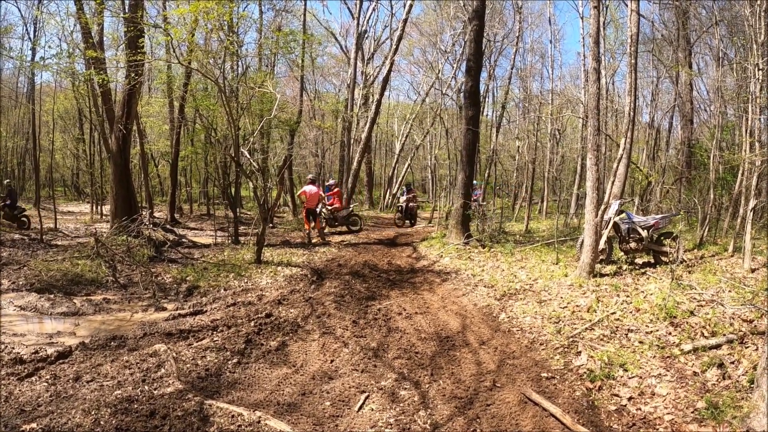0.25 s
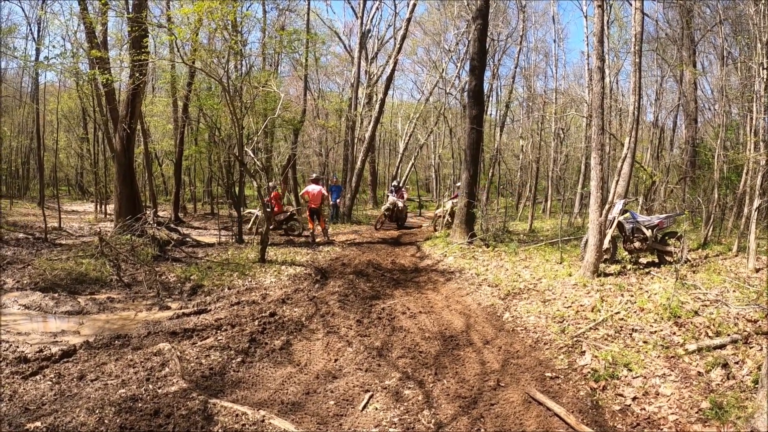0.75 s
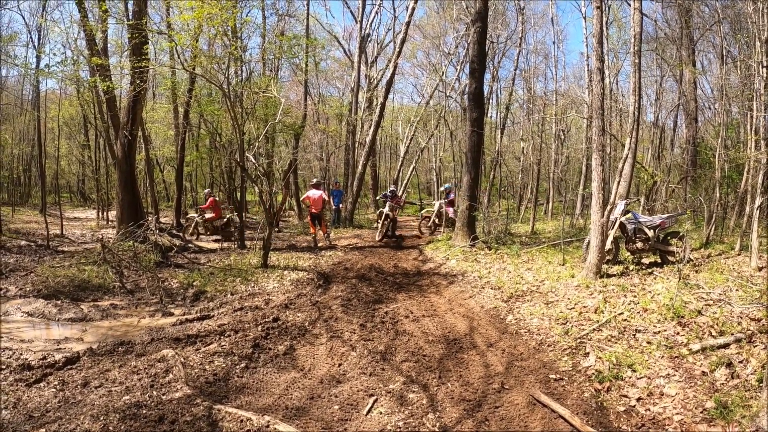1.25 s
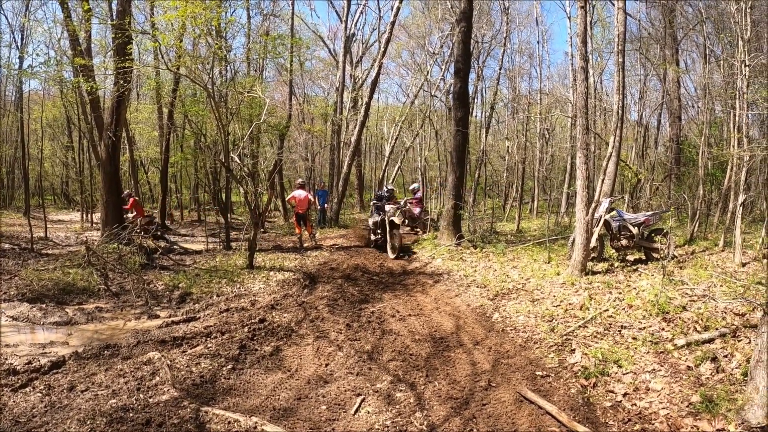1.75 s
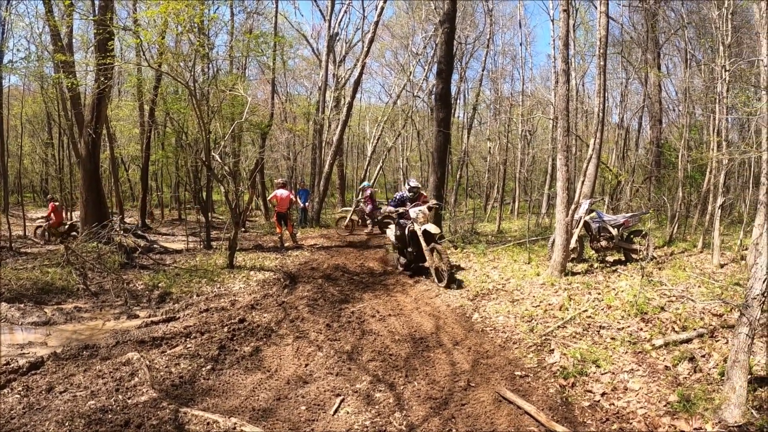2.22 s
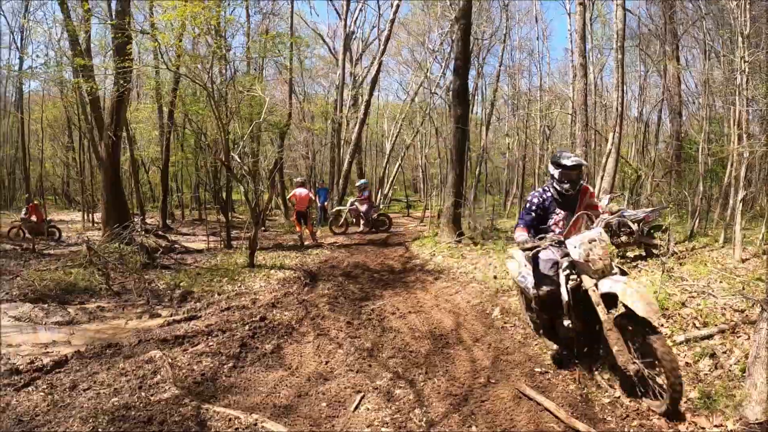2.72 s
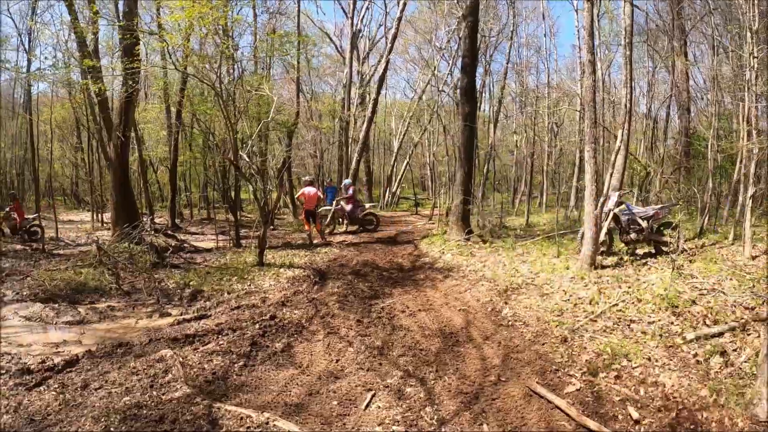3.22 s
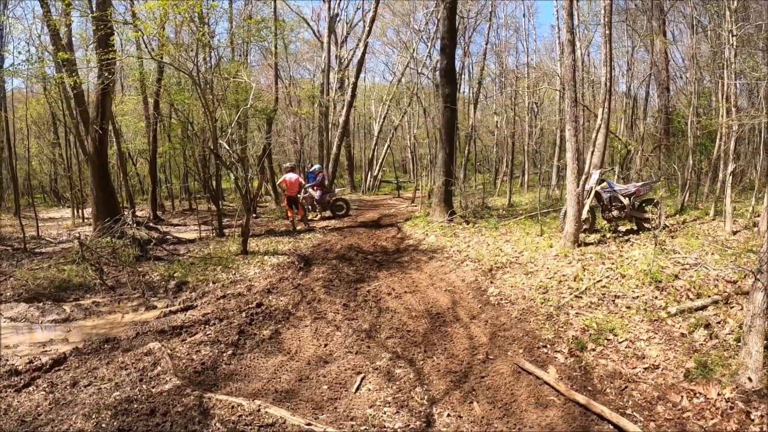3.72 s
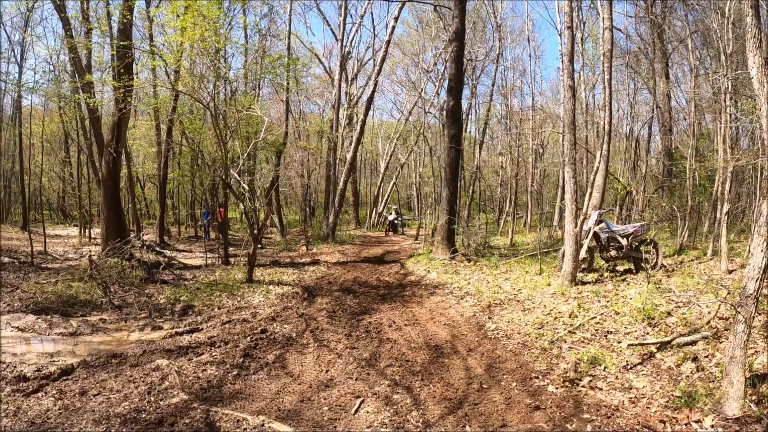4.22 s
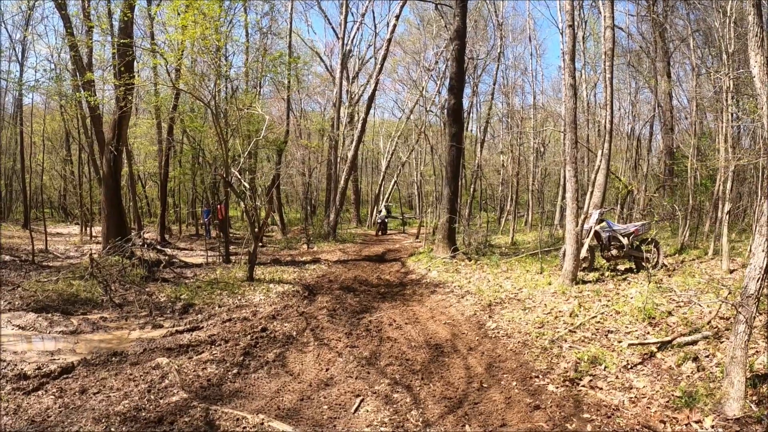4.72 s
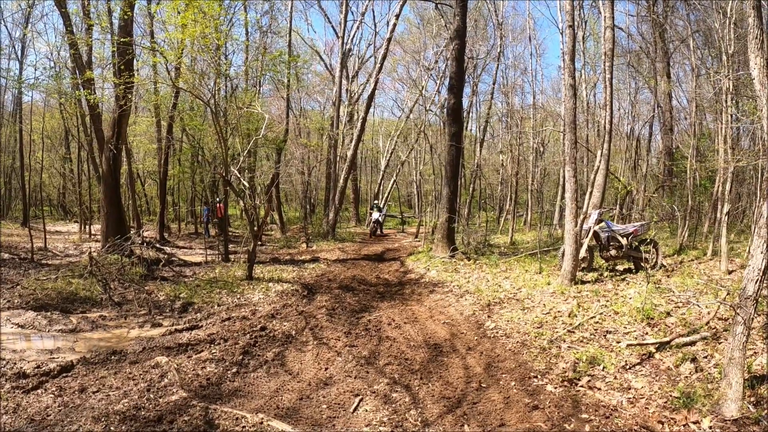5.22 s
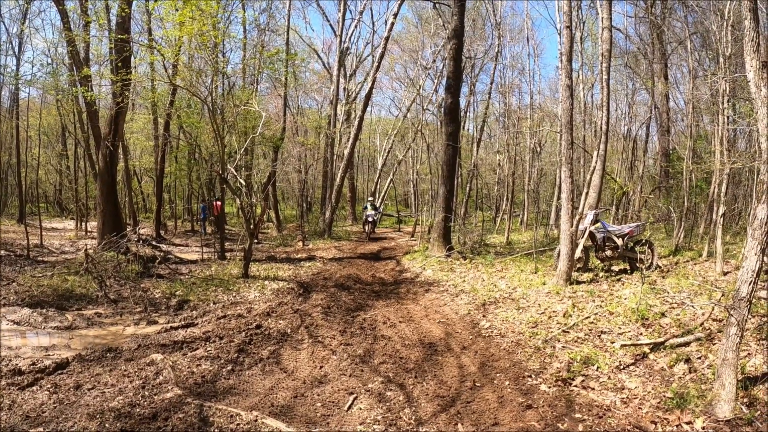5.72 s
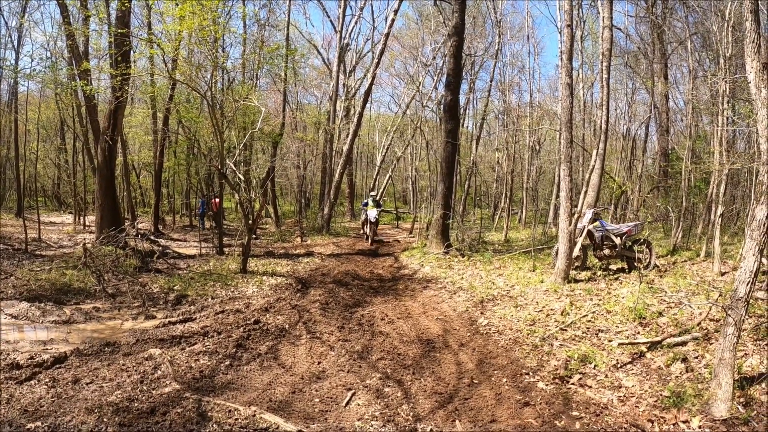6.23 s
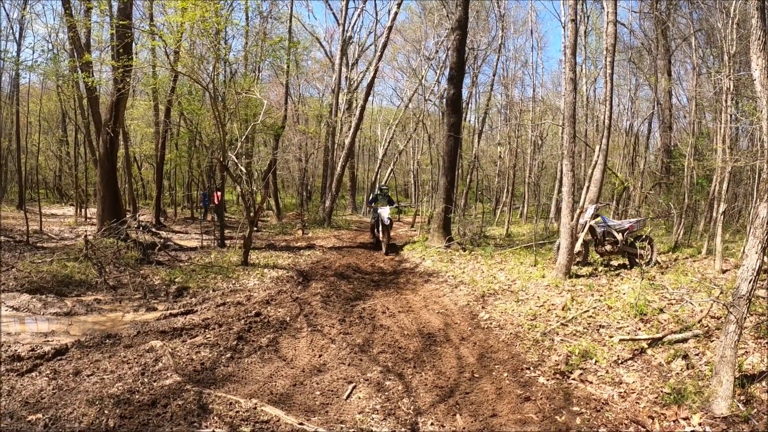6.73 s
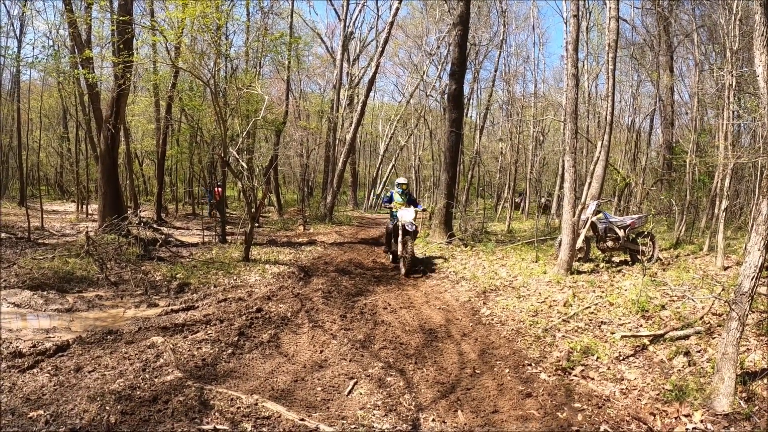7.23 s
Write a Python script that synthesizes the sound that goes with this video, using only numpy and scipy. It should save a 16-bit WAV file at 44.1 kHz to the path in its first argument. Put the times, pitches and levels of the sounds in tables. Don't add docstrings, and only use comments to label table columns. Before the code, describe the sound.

Dirt bikes on a forest trail, heard through a slightly muffled microphone over faint low rumble. From 0 s a low single-cylinder engine chugs, drops in pitch around 0.4 s, then pushes in uneven bursts; a higher engine blips its throttle, strongest near 1.4-1.9 s, and a third idles roughly, diffused by the trees. From 1.9 to 2.5 s the main bike pulls hard with a hoarse bark; a short snarl comes from the other near 2.6 s. Around 3-3.4 s it passes close, deep and throbbing with gritty dirt and chain noise, then rides off at higher revs. At 3.9 s everything stops dead. From 4.15 s distant engines fade in, nearly mono: a steady buzz, soft pops at 4.5 and 4.8 s, thin metallic ringing, and a slower wavering thump. After 6 s the buzz surges in quick bursts, nearing and widening until about 7.5 s.

```python
import sys
import numpy as np
from scipy import signal
from scipy.fft import rfft, irfft
from scipy.io import wavfile
from scipy.ndimage import uniform_filter1d

SR = 44100
rng = np.random.default_rng(int(sys.argv[2]) if len(sys.argv) > 2 else 0)


def digitize_waveform(pressure):
    field = np.atleast_2d(pressure).T
    bounded = np.clip(field, -1, 1)
    quanta = np.round(bounded * 32767).astype(np.int16)
    wavfile.write(sys.argv[1], SR, quanta)


def volts_from_decibels(level):
    exponent = np.asarray(level, float) / 20
    return 10 ** exponent


N = 328986
TIME = np.arange(N) / SR
CUT_S = 3.9228

# [centre_hz, width_hz, level_db]
TAILPIPE = [(544, 450, -8), (950, 240, 0.5), (1170, 217, -1), (1740, 610, -9), (2102, 170, -9.5)]
# [centre_hz, width_hz, level_db]
FAR_TAILPIPE = [(889, 176, -1.5), (1020, 93, 2.5), (1136, 78, 2), (1674, 490, -14), (2022, 145, -10.5)]


def rms_one(x):
    return x / np.sqrt(np.mean(x ** 2) + 1e-20)


def even(x, span_s=0.12):
    return x / np.sqrt(uniform_filter1d(x ** 2, int(span_s * SR)) + 1e-12)


def in_time(rows):
    s, *columns = np.transpose(rows)
    return [np.interp(TIME, s, column) for column in columns]


def bumps(span_s):
    span = int(span_s * SR)
    once = uniform_filter1d(rng.standard_normal(N), span)
    return rms_one(uniform_filter1d(once, span))


def convolve(x, response, skip=0):
    return signal.oaconvolve(x, response)[skip:skip + len(x)]


def band(x, low_hz, high_hz, order=2):
    return signal.sosfilt(signal.butter(order, [low_hz, high_hz], "band", fs=SR, output="sos"), x)


def bike(turns, rows, body, tail, rough, sudden, puff_s, wet_db, thump_db=0, bark_db=0):
    start_s, end_s = rows[0][0], rows[-1][0]
    heard = slice(max(int((start_s - .3) * SR), 0), int((end_s + .1) * SR))
    low_db, high_db = np.array(in_time(rows)[-2:])[:, heard]

    at = np.flatnonzero(np.diff(np.floor(turns)))
    luck = rng.standard_normal((600, 2))[:len(at)]
    at = np.clip(at + (.0012 * rough * luck[:, 0] * SR).astype(int), 0, N - 1)
    firing = np.zeros(N)
    firing[at] = volts_from_decibels(7 * rough * luck[:, 1])
    firing[0] = 1
    firing, t = firing[heard], TIME[heard]

    after = TIME[:SR // 20]
    puff = convolve(firing, after * np.exp(-after / (0.56 * puff_s)))
    rush = rms_one(puff * rng.standard_normal(N)[heard])

    thump = silencer(rms_one(firing) + .4 * rough * rush, body, sudden)
    thump = trees(thump, wet_db - 8)
    bark = pipe(rms_one(firing) + (0.6 + 1.5 * rough) * rush, tail)
    bark = trees(bark, wet_db)
    bark = band(band(bark, 280, 2210, order=4), 200, 2000, order=2)

    sounding = np.clip(np.minimum(t - start_s, end_s - t) / .04, 0, 1)
    out = np.zeros((2, N))
    out[0, heard] = (volts_from_decibels(low_db + thump_db) * even(thump) + volts_from_decibels(high_db + bark_db) * even(bark)) * sounding
    out[1, heard] = even(puff) * sounding * volts_from_decibels(high_db)
    return out


def silencer(x, points, sudden=1):
    hz, db = np.transpose(points + [(SR / 2, -130)])
    size = 2 ** 14
    half = size // 2
    bin_hz = np.arange(half + 1) * SR / size
    log_gain = np.interp(np.log(bin_hz + 1), np.log(hz), db) * np.log(10) / 20
    cepstrum = irfft(log_gain)
    cepstrum[1:half] *= 1 + sudden
    cepstrum[half:] *= 1 - sudden
    late = 2.4j * np.pi * (1 - sudden) * np.log(np.clip(bin_hz, 40, 900))
    response = np.roll(irfft(np.exp(rfft(cepstrum) - late)), size // 8)[:half]
    return convolve(x, response * signal.windows.tukey(half, .2), skip=size // 8)


def pipe(x, modes):
    out = 0
    for k, (hz, width_hz, db) in enumerate(modes):
        r = np.exp(-np.pi * width_hz / SR)
        b = (1 - r * r) / 2 * np.array([1, 0, -1])
        a = [1, -2 * r * np.cos(2 * np.pi * hz / SR), r * r]
        out = out + (-1) ** k * volts_from_decibels(db) * signal.lfilter(b, a, x + 1e-18)
    return out


def trees(x, wet_db):
    t60_s, build_s = 0.71, 0.014
    t = TIME[:SR // 2]
    scatter = rng.standard_normal(len(t)) * volts_from_decibels(-60 * t / t60_s) * np.clip(t / build_s, 0, 1)
    return x + volts_from_decibels(wet_db) * convolve(x, scatter / np.linalg.norm(scatter))


def revs(rows):
    return np.cumsum(in_time(rows)[0]) / SR


def throttle(openings, t):
    open_s, close_s = 0.043, 0.052
    s, length = np.array(openings)[:, :2].T[..., None]
    return np.clip(np.minimum((t - s) / open_s, 1 - (t - s - length) / close_s), 0, 1)


def ride(openings, shut, rates, start_s, end_s):
    t = np.arange(start_s, end_s, 64 / SR)
    rows, opened = np.array(openings), throttle(openings, t)
    levels = []
    for k in (-2, -1):
        power = volts_from_decibels(2 * shut[k]) + volts_from_decibels(2 * rows[:, k]) @ opened ** 2
        levels.append(10 * np.log10(power))
    return np.transpose([t, np.interp(t, *np.transpose(rates)), *levels])


def passing_bike():
    # [start_s, rate_hz]
    approach_rate = [(0.0, 36.87), (0.3, 35.01), (0.36, 20.62), (0.49, 20.24), (0.64, 27.91), (0.8, 26.82),
                     (0.93, 22.19), (1.1, 27.17), (1.22, 35.76), (1.45, 34.38), (1.8, 35.09), (2.03, 38.66),
                     (2.14, 34.82), (2.36, 42.0), (2.5, 30.94), (2.85, 31.22)]
    sweep_rate = [(2.96, 28.98), (3.13, 35.27), (3.24, 36.01), (3.31, 34.02), (3.43, 44.53), (3.6, 42.25),
                  (3.72, 43.17), (3.79, 40.32), (3.93, 43.6)]
    # [start_s, length_s, thump_db, bark_db]
    front_load = [
        (.45, 0.13, -18, -37),
        (.92, 0.28, -24, -36.5),
        (1.14, 0.24, -18, -32.5),
        (1.4, 0.31, -17.5, -40.5),
        (1.68, 0.2, -15, -23.5),
        (2.45, 0.62, -20.5, -41),
        (2.9, 0.37, -17.5, -31),
    ]
    # [start_s, thump_db, bark_db]
    pull_load = [
        (1.799, -27, -41),
        (1.898, -14.5, -20.5),
        (2.03, -14, -21),
        (2.12, -15.5, -26),
        (2.22, -13, -22),
        (2.36, -14.5, -20),
        (2.44, -17, -27.5),
        (2.52, -30.5, -39.5),
    ]
    # [start_s, thump_db, bark_db]
    snap_load = [
        (1.13, -51, -37),
        (1.17, -45, -28),
        (1.26, -40, -20.5),
        (1.359, -48, -27.5),
        (1.48, -45.5, -36),
    ]
    # [start_s, thump_db, bark_db]
    beside_load = [
        (2.989, -23.5, -22),
        (3.099, -18.5, -21.5),
        (3.199, -12.5, -24.5),
        (3.33, -10.5, -23),
        (3.39, -15.5, -25),
        (3.52, -29, -49),
    ]
    # [start_s, thump_db, bark_db]
    rear_load = [
        (3.299, -24, -45),
        (3.389, -17, -22),
        (3.45, -13, -20.5),
        (3.599, -13.5, -20),
        (3.719, -17, -21),
        (3.801, -14, -25),
        (3.971, -15.5, -23.5),
    ]
    # [frequency_hz, gain_db]
    front_pipe = [(25, -76), (36, -24), (72, 5), (105, -5), (140, 1), (172, 12.5), (210, 1.5), (260, -15),
                  (380, -8), (470, -29), (700, -82)]
    pull_pipe = [(25, -53), (38, -24.5), (78, 11.5), (110, -8), (145, -0.5), (190, 11.5), (230, -0.5),
                 (290, -7), (380, -1), (450, -16), (560, -42), (750, -79.5)]
    beside_pipe = [(25, -34), (36, -17.5), (71, 5.5), (105, -7.5), (142, 4.5), (176, 5), (250, -18),
                   (310, 1), (360, 7), (420, 3), (470, -24.5), (530, -5.5), (620, -30.5), (760, -6.5),
                   (1000, -59.5)]
    rear_pipe = [(25, -39.5), (42, -2), (84, 5), (128, -2.5), (172, 3.5), (230, -6.5), (300, -11.5),
                 (370, 0.5), (430, -3.5), (490, -10), (600, -4.5), (720, -13.5), (1000, -93)]
    # [centre_hz, width_hz, level_db]
    pull_tail = [(973, 170, 5.5), (1286, 216, 1), (1750, 350, -7), (2140, 120, -9.5)]
    snap_tail = [(1030, 290, -6.5), (1270, 160, -2.5), (1640, 280, -16), (2090, 110, -13.5)]
    rear_tail = [(570, 240, -3), (776, 290, -3), (930, 130, 1), (1140, 130, 2), (1590, 370, -9),
                 (2000, 230, -13.5)]

    first_turn, lead_s = .4615, .006
    turns = np.interp(TIME + lead_s, TIME, first_turn + revs(approach_rate + sweep_rate))
    front = ride(front_load, (-20.5, -53.5), approach_rate, -.04, 3.2)
    return sum([
        bike(turns, front, front_pipe, TAILPIPE, .09, .3, puff_s=.006, wet_db=-8),
        bike(turns, pull_load, pull_pipe, pull_tail, .12, .4, puff_s=.006, wet_db=-6),
        bike(turns, snap_load, pull_pipe, snap_tail, .1, .4, puff_s=.008, wet_db=-3),
        bike(turns, beside_load, beside_pipe, rear_tail, .08, .75, puff_s=.008, wet_db=-16),
        bike(turns, rear_load, rear_pipe, rear_tail, .08, .8, puff_s=.006, wet_db=-16, bark_db=-.5)])


def blipping_bike():
    # [start_s, length_s, thump_db, bark_db]
    blips = [
        (-.1, 0.12, -18.5, -39),
        (.04, 0.13, -16.5, -36.5),
        (.68, 0.24, -21, -51),
        (.93, 0.59, -23.5, -32.5),
        (1.36, 0.35, -18, -29),
        (2.44, 0.37, -35, -33.5),
        (2.69, 0.2, -26.5, -38),
    ]
    # [start_s, thump_db, bark_db]
    snarl = [
        (2.4, -35.5, -42.5),
        (2.5, -38.5, -27.5),
        (2.619, -68, -23.5),
        (2.691, -49, -28),
        (2.76, -41.5, -41.5),
    ]
    # [start_s, rate_hz]
    blip_rate = [(0, 63.5), (.08, 58.5), (.2, 67), (.3, 63), (.6, 54), (.68, 63), (.75, 54), (.87, 61),
                 (.92, 63), (1.0, 61), (1.15, 58), (1.36, 62), (1.45, 65.5), (1.62, 68.5), (1.72, 71.5),
                 (1.9, 64), (2.3, 57), (2.55, 65), (2.68, 76), (2.95, 55), (3.3, 52)]
    # [frequency_hz, gain_db]
    blip_pipe = [(35, -42.5), (62, -19), (125, -12.5), (190, -9), (255, 5), (305, 2.5), (380, -16.5),
                 (480, -30), (800, -69.5)]
    # [centre_hz, width_hz, level_db]
    open_tail = [(974, 340, 0), (1420, 430, 2), (1930, 120, -5), (2800, 550, -2)]

    blipping = ride(blips, (-34.5, -35), blip_rate, -.04, 3.3)
    turns = revs(blipping)
    return sum([bike(turns, blipping, blip_pipe, TAILPIPE, .07, .4, puff_s=.007, wet_db=-5),
                bike(turns, snarl, blip_pipe, open_tail, .1, .4, puff_s=.003, wet_db=-6)])


def approaching_ride():
    # [start_s, length_s, thump_db, bark_db]
    openings = [(4.18, 0.35, -28, -34.5), (4.52, 0.68, -29, -30.5), (5.2, 0.26, -22.5, -32.5),
                (5.38, 0.3, -22, -31), (5.68, 0.28, -22, -27), (6.1, 0.051, -21.5, -37.5),
                (6.19, 0.13, -17.5, -24), (6.48, 0.25, -21, -25), (6.76, 0.25, -22, -25),
                (7.1, 0.076, -24.5, -30), (7.18, 0.18, -17.5, -26), (7.39, .14, -23.5, -33)]
    # [start_s, rate_hz]
    coming_rate = [(4.15, 55.8), (4.492, 55.7), (4.644, 51.9), (4.748, 54.3), (5.18, 54.7), (5.44, 63.6),
                   (5.638, 61.3), (5.904, 63.7), (6.02, 61.0),
                   (6.06, 60), (6.13, 59), (6.2, 55), (6.29, 63), (6.36, 65.5), (6.46, 57), (6.54, 57),
                  (6.64, 61), (6.72, 58), (6.79, 52.5), (6.92, 61), (7.0, 62), (7.06, 57), (7.11, 51),
                  (7.19, 54.5), (7.29, 63.5), (7.37, 62), (7.46, 55)]
    return ride(openings, (-38.5, -36.5), coming_rate, 4.1, 7.5)


def approaching_bike(coming):
    # [frequency_hz, gain_db]
    small_pipe = [(35, -58.5), (62, -7.5), (125, 2), (186, 1.5), (250, 6.5), (310, -8), (400, -5),
                  (480, -9.5), (560, -31), (800, -74.5)]
    return bike(revs(coming), coming, small_pipe, FAR_TAILPIPE, .08, .3, puff_s=.009, wet_db=-3,
                thump_db=1.5, bark_db=-.7)


def slower_bike():
    # [start_s, thump_db, bark_db]
    trailing = [(4.099, -24, -33), (4.35, -22.5, -27.5), (4.6, -20, -31.5), (4.9, -21, -33),
                (5.198, -24, -30), (5.45, -23, -26), (5.78, -20.5, -28.5), (6.05, -21, -29),
                (6.331, -20.5, -27.5), (6.55, -17, -28), (6.8, -17.5, -26), (7.099, -19.5, -27.5),
                (7.3, -20.5, -22.5), (7.5, -15.5, -21.5)]
    # [start_s, rate_hz]
    trailing_rate = [(4.15, 34.7), (4.66, 33.2), (5.26, 37.7), (5.45, 29), (5.76, 34.5), (6.39, 35.5),
                     (6.55, 34), (6.85, 32.5), (7.11, 36), (7.46, 33)]
    # [frequency_hz, gain_db]
    slow_pipe = [(25, -41), (35, -24), (68, 0.5), (105, -1.5), (140, 2), (190, -5), (300, -12), (450, -16),
                 (560, -38.5), (700, -50.5)]
    waver, waver_s = .025, .08
    turns = np.cumsum(in_time(trailing_rate)[0] * (1 + waver * bumps(waver_s))) / SR
    return bike(turns, trailing, slow_pipe, FAR_TAILPIPE, .3, .2, puff_s=.02, wet_db=3, thump_db=-.6)


def waiting_bike():
    # [start_s, rate_hz, thump_db, bark_db]
    waiting = [
        (-.04, 45.06, -27, -24.5),
        (.3, 43.15, -19.5, -37),
        (0.699, 41.99, -18.5, -32.5),
        (1.098, 41.4, -18, -36.5),
        (1.6, 43, -18, -23.5),
        (2.098, 42.14, -22, -32.5),
        (2.5, 43.21, -18, -27),
        (2.898, 45.12, -20.5, -26),
        (3.203, 44.25, -26, -34.5),
    ]
    # [frequency_hz, gain_db]
    lazy_pipe = [(25, -37), (35, -20.5), (68, 3), (110, 1.5), (150, 10.5), (200, -1.5), (300, -4),
                 (480, -16), (700, -65.5)]
    return bike(revs(waiting), waiting, lazy_pipe, TAILPIPE, .5, .3, puff_s=.012, wet_db=5)


def rattle(beat, colour, gated):
    late_s, sharpness = .0028, 1.6
    late = np.interp(TIME - late_s, TIME, even(beat))
    burst = even(np.abs(late) ** sharpness) * volts_from_decibels(2.5 * bumps(0.011))
    gate = 1 - gated + gated * burst
    return np.array([even(silencer(gate * noise, colour), span_s=0.041) for noise in rng.standard_normal((2, N))])


def rattle_level(beats, coming):
    # [start_s, extra_db]
    dirt = [(.61, 2.5), (1.55, 3), (1.722, 5.5), (2.401, 1.5), (2.65, 4), (2.78, 7), (2.879, 4),
            (2.98, 6.5), (3.109, 3.5), (3.19, 4.5), (3.341, 3.5), (3.441, 4.5), (3.618, 3.5), (3.816, 7.5),
            (3.901, 1)]
    dirt_s = 0.059
    bark_db = 10 * np.log10(uniform_filter1d(beats ** 2, SR // 12) + 1e-6) + 22
    dirt_db = sum(db * np.exp(-np.abs(TIME - s) / dirt_s) for s, db in dirt)
    near_db = -42 + 0.61 * bark_db + dirt_db
    rate, _, coming_bark_db = in_time(coming)
    far_db = -51.5 + 0.4 * bark_db + 0.23 * (coming_bark_db + 28) + 0.24 * (rate - 55)
    return np.where(TIME < CUT_S, near_db, far_db)


def engine_rattle(beats, coming):
    # [frequency_hz, gain_db]
    near_colour = [(1350, -5.5), (2300, -11), (2540, -22), (2800, -16), (3400, -5.5), (4270, -14.5),
                   (4600, -11.5), (5100, -16), (5900, -25.5), (6500, -26), (7500, -32), (9000, -39.5),
                   (10500, -38), (12500, -38), (13200, -54)]
    far_colour = [(1350, -36), (2300, -20), (2530, -15), (2820, -6), (3200, -7), (3960, -5), (4570, -6.5),
                  (5140, -7), (5500, -14.5), (5900, -13), (6460, -19), (7500, -30), (9000, -37.5),
                  (11000, -39), (13000, -54)]
    from_s, to_s, rise_s = 3.1, 3.8, 0.3
    facing = np.clip(np.minimum(TIME - from_s, 2 * (to_s - TIME)) / rise_s, 0, 1)
    near = rattle(beats, near_colour, gated=0.26 + 0.45 * facing)
    far = rattle(beats, far_colour, gated=0.22)
    return volts_from_decibels(rattle_level(beats, coming)) * np.where(TIME < CUT_S, near, far)


def howl(coming):
    centre_hz, width_hz = 5000, 840
    rate, _, bark_db = in_time(coming)
    nearing_db = 10.5 * np.minimum(TIME - 5.2, .8)
    db = -64.5 + 0.47 * (rate - 55) + bark_db + 28.5 + nearing_db
    roar = band(rng.standard_normal(N), centre_hz - width_hz / 2, centre_hz + width_hz / 2)
    return volts_from_decibels(db) * rms_one(roar) * (TIME > CUT_S)


def ringing():
    # [start_s, length_s, centre_hz, width_hz, level_db]
    panels = [
        (4.25, 0.49, 3500, 300, -57),
        (5.25, 0.27, 2800, 220, -55.5),
        (5.3, .45, 5100, 200, -61),
        (5.3, .5, 4600, 250, -59.5),
    ]
    noise = rng.standard_normal(N)
    out = 0
    for (_, _, hz, width_hz, db), on in zip(panels, throttle(panels, TIME)):
        out = out + volts_from_decibels(db) * on * rms_one(band(noise, hz - width_hz / 2, hz + width_hz / 2))
    return out


def pops():
    # [start_s, peak_db]
    pop_times = [
        (4.505, -18.5),
        (4.761, -21.5),
    ]
    # [centre_hz, width_hz, level_db]
    pop_pipe = [(596, 150, 3.5), (780, 160, -5)]
    clicks = np.zeros(N)
    for s, db in pop_times:
        clicks[int(s * SR)] = volts_from_decibels(db + 35)
    return band(pipe(clicks, pop_pipe), 300, 1200, order=3)


def rumble():
    return volts_from_decibels(-29) * rms_one(band(rng.standard_normal(N), 35, 130))


def two_ports(mid, loose_rattle, exhausts):
    # [start_s, left_minus_right_db, unshared_treble_db]
    spread = [
        (0, .5, -6),
        (1.5, 1, -8),
        (3.92, 1.8, -8),
        (3.93, 0, -50),
        (6.3, 0, -62.5),
        (6.6, 0.03, -12.5),
        (7.46, 0.74, -1.5),
    ]
    pan_db, loose_db = in_time(spread)
    smear = rng.standard_normal(300) * np.hanning(300)
    blurred = convolve(band(exhausts, 400, 1800), smear / np.linalg.norm(smear))
    loose = band(band(loose_rattle, 2900, 7200), 2000, 6500) + volts_from_decibels(-21.0) * blurred
    lag = 4.5e-5 * np.clip(TIME - .3, 0, 1) * (TIME < CUT_S)
    ports = np.array([np.interp(TIME - lag / 2, TIME, mid), np.interp(TIME + lag / 2, TIME, mid)])
    return ports * volts_from_decibels(pan_db * [[.5], [-.5]]) + volts_from_decibels(loose_db) * loose * [[1], [-1]]


def scene():
    coming = approaching_ride()
    exhausts, beats = (passing_bike() + blipping_bike() + approaching_bike(coming)
                       + slower_bike() + waiting_bike())
    shared, loose = engine_rattle(beats, coming)
    mid = exhausts + shared + howl(coming) + ringing() + pops() + rumble()
    return two_ports(mid, loose, exhausts)


def low_pass(x):
    return signal.sosfilt(signal.butter(12, 15200, fs=SR, output="sos"), x)


def record(dry):
    resume_s, fade_s = 4.15, .08
    fade = np.clip((TIME - resume_s) / fade_s, 0, 1) ** 2.0
    mix = np.tanh(dry) * np.where(TIME < CUT_S, 1, fade)
    return low_pass(mix)


dry = scene()
out = record(dry)
digitize_waveform(out)
```